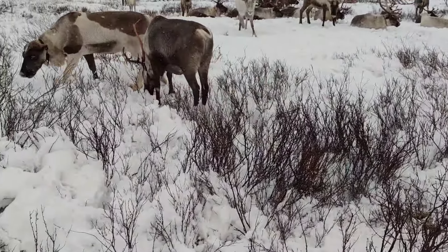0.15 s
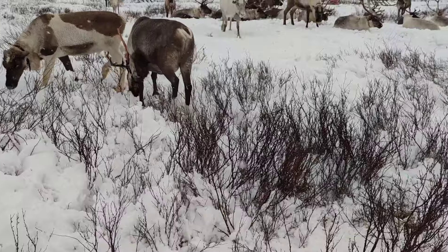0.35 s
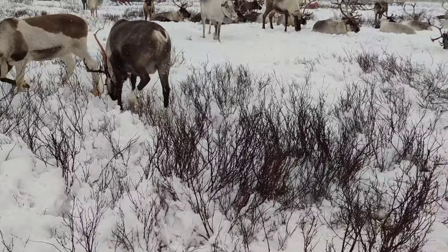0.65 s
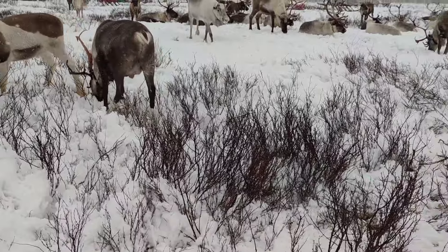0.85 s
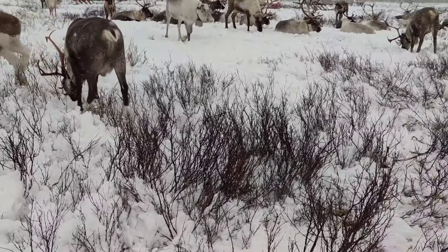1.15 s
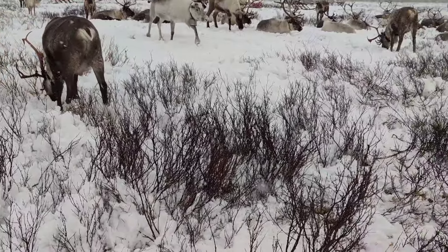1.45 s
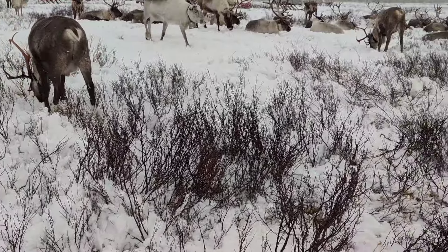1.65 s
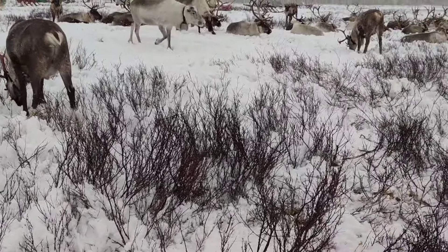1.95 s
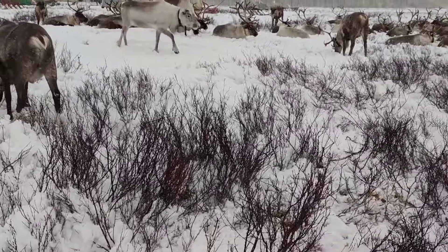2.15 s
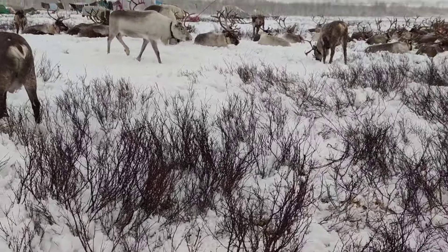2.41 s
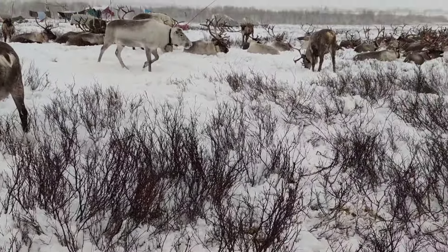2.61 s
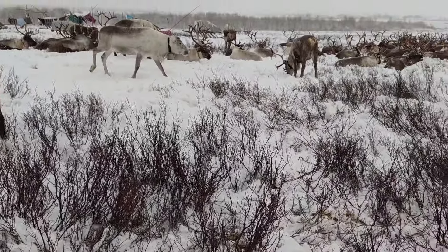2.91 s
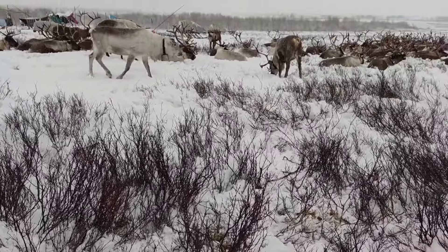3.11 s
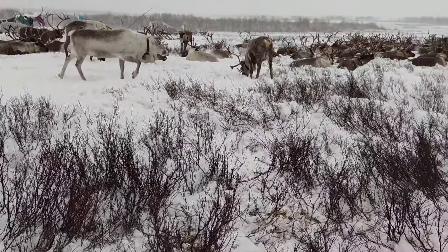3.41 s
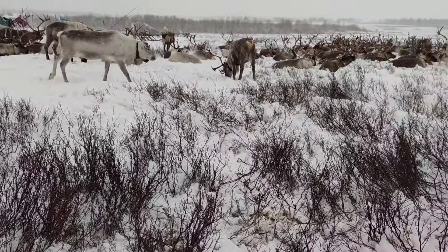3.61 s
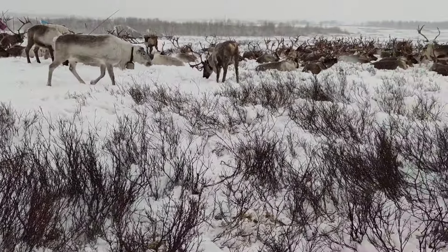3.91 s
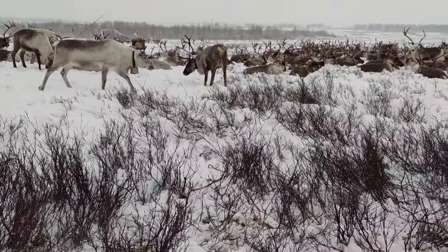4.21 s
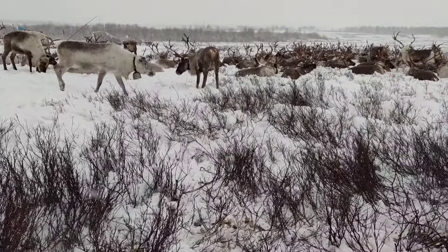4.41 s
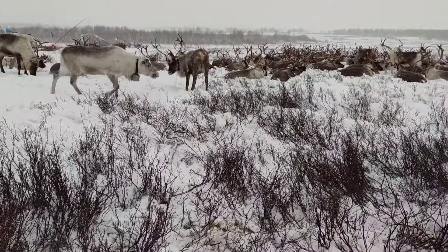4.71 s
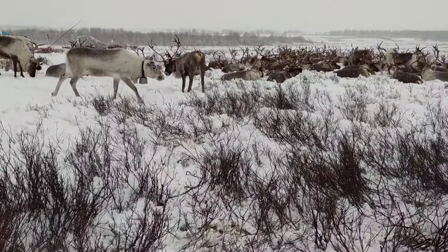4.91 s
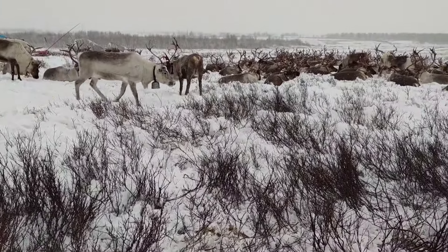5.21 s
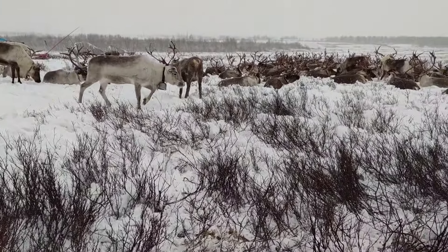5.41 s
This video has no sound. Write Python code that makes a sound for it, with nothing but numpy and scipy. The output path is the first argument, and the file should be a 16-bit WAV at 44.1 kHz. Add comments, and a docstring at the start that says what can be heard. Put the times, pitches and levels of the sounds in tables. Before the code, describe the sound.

Outdoors among reindeer on snow and low brush, close and dry, without echo. The first 0.35 seconds are dominated by rough wind flutter and thumps on the microphone, hardest on the right; beneath them a low bell hum already rings, a tiny bell tinkles and a faint far bell pings at about 0.2. From 0.6 a collar bell clanks roughly every 0.3 to 0.4 seconds, uneven in strength and tone: short, rattly, metallic strikes with bright overtones and a lingering hum. Pellet tinkles scatter around 0.5, 1.4 to 2.0 and 3.8 to 4.7. Crisp snow crunch and dry twig snaps run throughout, busy around 2.3 to 3.5, with a sharp snap near 4.2. Low wind rumble continues with smaller buffets, notably around 2.7 and 4.3. The clanks fade and end at 4.9; last tinkles come at 5.2 to 5.4 as the crunch swells, ending near 5.5.

```python
"""Reindeer graze and walk through snow and low brush.
At the start, gusts flutter hardest on the right, a low bell hum already rings and a far bell pings once.
Then a collar bell clanks as one animal steps: its clapper strikes wall modes that ring and fade.
All along, noise grains crunch as snow, short noise puffs snap as twigs, and a tiny pellet bell tinkles.
Near the end the clanks have stopped; the pellet bell tinkles a last few times and the crunch swells."""
import sys
import numpy as np
from scipy import signal
from scipy.fft import rfft, irfft, next_fast_len
from scipy.io import wavfile
from scipy.ndimage import uniform_filter1d, map_coordinates

SR = 44100
rng = np.random.default_rng(int(sys.argv[2]) if len(sys.argv) > 2 else 0)


def wav_record(signal):
    """Record a signal, one row per channel, as 16-bit PCM in the file named by sys.argv[1]."""
    frames = np.transpose(np.atleast_2d(signal))
    bounded = np.clip(frames, -1, 1)
    # unit amplitude maps onto the largest positive 16-bit level
    quanta = np.round(bounded * 32767).astype(np.int16)
    wavfile.write(sys.argv[1], SR, quanta)


N = 244755  # length in samples


def amp(db):
    """Turn decibels into a gain."""
    return np.exp(np.asarray(db) * np.log(10) / 20)


def unit(x):
    """Scale to rms 1."""
    return x / np.sqrt(np.mean(x ** 2) + 1e-20)


def pan(db):
    """Left and right gains, with mean 1, for a left-minus-right level in dB."""
    gains = amp(np.reshape(db, (1, -1)) * np.array([[.5], [-.5]]))
    return gains / gains.mean(0)


def curves(rows):
    """Join table points with straight lines: one curve for each column after the time."""
    times, *columns = np.transpose(rows)
    return [np.interp(np.arange(N) / SR, times, column) for column in columns]


def wobble(rate):
    """A smooth random curve through `rate` random points a second."""
    points = rng.standard_normal(int(N * rate / SR) + 4)
    return map_coordinates(points, [np.arange(N) * rate / SR])


def filtered(x, response):
    """Change the level of each frequency in x by response(Hz)."""
    size = next_fast_len(N + SR // 4)
    spectrum = rfft(x, size) * response(np.fft.rfftfreq(size, 1 / SR))
    return irfft(spectrum, size)[..., :N]


def coloured(x, spectrum):
    """Shape x by (f/Hz, level/dB) points, at rms 1."""
    f, db = np.transpose(spectrum)
    return unit(filtered(x, lambda hz: amp(np.interp(np.log(hz + 1), np.log(f), db))))


def even(x, seconds):
    """Hold noise near rms 1 over stretches of this length, leaving its faster lumps."""
    size = int(seconds * SR) + 1
    power = uniform_filter1d(uniform_filter1d(x ** 2, size), size)
    return x / np.sqrt(np.abs(power) + 1e-9)


def add(track, s, sound):
    """Mix a sound into the track at time s."""
    start = max(round(s * SR), 0)
    part = track[..., start:start + sound.shape[-1]]
    part += sound[..., :part.shape[-1]]


def burst(lo_hz, hi_hz, t60, order=2, rise=0):
    """A dying puff of noise in a band, with peak 1; rise is its build-up in seconds."""
    t = np.arange(SR // 10) / SR
    band = signal.butter(order, [lo_hz, min(hi_hz, SR / 2 - 1)], "band", fs=SR, output="sos")
    onset = np.minimum(t / rise, 1) if rise else 1
    puff = signal.sosfilt(band, rng.standard_normal(len(t)) * onset * amp(-60 * t / t60))
    return puff / np.abs(puff).max()


def ring(modes, attack, scatter_db):
    """One blow on a bell: each mode is a pure tone that fades, with its own level and delay on each side."""
    t = np.arange(SR // 2) / SR
    out = np.zeros((2, len(t)))
    for hz, db, t60, side_db, lead in modes:
        fade = amp(db + scatter_db * rng.standard_normal() - 60 * t / t60)
        phase = 2 * np.pi * hz * t + lead * np.array([[.5], [-.5]])
        out += pan(side_db) * fade * np.sin(phase)
    return out * (1 - np.exp(-t / attack))


# blows of the clapper: (t/s, level/dB, height on the wall about -1..1, angle round the rim/degrees,
# extra strike note level/dB, extra clang level/dB, clang shift f/Hz, low hum level/dB)
CLAPPER_BLOWS = [(0.64,-50,1.23,100,-1.5,-17,0,-58), (0.991,-43,-0.46,54,-7,-1.5,-8,-63.5),
                 (1.339,-48,0.53,97,6.5,-19,0,-64), (1.756,-44,-0.67,33,6.5,-4,21,-57.5),
                 (2.103,-40,-0.89,11.6,0.5,3.5,8,-63), (2.522,-44.5,0.25,54,-12.5,3.5,16,-62.5),
                 (2.801,-39,0.94,70.4,4,-0.5,1,-59), (3.211,-53,0.45,56,0,-6,0,-64),
                 (3.51,-40.5,0.9,15.8,-0.5,-5,5,-63.5), (3.887,-48,1.4,86,6.5,0.5,4,-65),
                 (4.167,-43.5,1.03,72,-0.5,-2.5,15,-52.5), (4.577,-59,1.4,56,-4.5,-5.5,0,-70),
                 (4.901,-55,0.77,96,-3,1.5,6,-55)]
# tones of the collar bell: (f/Hz, relative level/dB, 60 dB fade t/s, waves round the rim,
# antinode (strongest spot)/degrees, node depth 0-1, level per unit of height/dB, left minus right level/dB,
# left phase lead/radians)
COLLAR_MODES = [(2342.5, 0, .43, 2, 0, 0, 1.4, -7, .58), (4138, 0, .08, 4, 55, .8, 4.1, -3, .2),
                (4243, 12, .08, 4, 77.5, 1, 4.1, -3, .2), (4195, -3, .03, 4, 55, .3, 4.1, -3, .2),
                (4310, -9, .06, 4, 86, 1, 4.1, -3, .2), (6182, -1, .19, 5, 25, 1, 8.8, -10, 2.3),
                (6319, 2, .25, 5, 43, 1, 8.8, -10, 2.4), (6684, 4, .21, 2, 18, 1, -2.2, -9, 1.3),
                (6863, 5, .21, 2, 63, 1, -2.2, -9, 1.4), (8583, -4, .18, 6, 39, 1, 2, 4, 2.6),
                (8760, -6, .14, 6, 54, 1, 2, 3, 2.6), (10700, -11, .11, 7, 0, .4, 0, -13, 2.5),
                (11160, -11, .13, 3, 10, .4, 0, -14, 2.6), (11375, -9, .14, 3, 40, .4, 0, -14, 3.1),
                (12980, -14, .11, 8, 0, .4, 0, -13, -.3)]
NODE_FLOOR = 0.01  # added to the 0-1 energy of a struck mode, so a node is never silent
CLANG_ROUGH, CLANG_ROUGH_HZ = .22, 150  # depth of the clang's random roughness; its random points a second
SCUFF_DB, KNOCK_DB = -1.5, -1.5  # relative to the blow


def collar_bell():
    """The clapper knocks, scuffs and chatters; where it hits sets how strongly each wall mode rings."""
    out, clang = np.zeros((2, 2, N))
    hz, mode_db, t60, waves, antinode, depth, height_db, side_db, lead = np.transpose(COLLAR_MODES)
    is_note = hz < 3000
    is_clang = (hz > 3000) & (hz < 5000)
    for s, db, height, angle, note_db, clang_db, shift_hz, _ in CLAPPER_BLOWS:
        # a blow far from a mode's strongest spot excites it less
        closeness = np.cos(np.radians(waves * (angle - antinode))) ** 2
        node_db = 10 * np.log10(closeness + NODE_FLOOR)
        level_db = db + mode_db + height_db * height + depth * node_db
        level_db = level_db + note_db * is_note + clang_db * is_clang
        modes = np.transpose([hz + shift_hz * is_clang, level_db, t60, side_db, lead])
        add(out, s, ring(modes[~is_clang], attack=0.001, scatter_db=0.4))
        add(clang, s, ring(modes[is_clang], attack=0.0017, scatter_db=6.0))
        scuff = amp(db + SCUFF_DB) * burst(1200, 8600, t60=0.075, order=4)
        splash = amp(db - 6) * burst(10600, 13300, t60=0.15, order=4)
        knock = amp(db + KNOCK_DB) * burst(800, 7600, t60=0.011)
        add(out, s, pan(-3) * scuff)
        add(out, s, pan(-21) * splash)
        add(out, s - .001, pan(-22) * knock)
    return out + clang * (1 + CLANG_ROUGH * wobble(CLANG_ROUGH_HZ))


HUM_HZ, HUM_T60_S, HUM_START_DB = 865, 2.9, -57  # pitch, 60 dB fade time, level at the very start


def bell_hum():
    """The collar bell's lowest mode sings on from blow to blow; the strongest swell wins."""
    t = np.arange(N) / SR
    blows = [(0, HUM_START_DB)] + [(s, hum_db) for s, *_, hum_db in CLAPPER_BLOWS]
    swells = []
    for s, db in blows:
        onset = np.clip((t - s) / 0.0018, 0, 1)
        swells.append(amp(db - 60 * np.abs(t - s) / HUM_T60_S) * onset)
    return pan(-3.5) * np.max(swells, axis=0) * np.sin(2 * np.pi * HUM_HZ * t)


# blows of the pellet, before the gain below: (t/s, level/dB,
# lowest family relative level/dB, highest family relative level/dB)
PELLET_BLOWS = [(.029, -60, -28, -32), (0.098, -45.5, -19, -3.5), (0.432, -59, -17, -3),
                (.527, -53, -32, -9), (.593, -59.5, -19, -2), (1.377, -61.5, -16, -10),
                (1.471, -57.5, -13.5, -12), (1.549, -55, -24, -12), (1.642, -65.5, -11.5, -8),
                (1.927, -50, -20, -12), (1.981, -49, -28, -14), (3.782, -58.5, -29, -8),
                (3.899, -45, -29, -9), (4.088, -60, -24, -7), (4.271, -54, -31, -16), (4.485, -53, -27, -4),
                (4.648, -58, -25, -8), (5.162, -47.5, -42, -14), (5.323, -47, -36, -14.5),
                (5.411, -42, -34, -23)]
# tones of the pellet bell, one list for each of three families, low to high: (f/Hz, level in the family/dB,
# 60 dB fade t/s, left minus right level/dB, left phase lead/radians)
PELLET_MODES = [
    [(2940, -5.5, 0.21, 18, 0.35), (2986, 5.5, 0.46, -14, 0.34)],
    [(3810, -36, .5, -9, .2), (4888, -34, .5, -6, .6), (5636, -31, .6, -8, 1.2), (7654, -1, .38, 1, -.5),
     (7680, -12, .3, 1, -.5)],
    [(11480, -8, .16, -12, -2.5), (11782, -4, .17, -14, -1.5), (11915, -9, .16, -14, -1.6),
     (12085, -5, .17, -15, -1.7)],
]


def pellet_bell():
    """A loose pellet strikes a tiny shell; modes close in pitch beat against each other."""
    out = np.zeros((2, N))
    for s, db, low_db, high_db in PELLET_BLOWS:
        modes = []
        for family, family_db in zip(PELLET_MODES, [low_db, 0, high_db]):
            for hz, mode_db, *rest in family:
                modes.append((hz, db + family_db + mode_db, *rest))
        add(out, s, amp(4.0) * ring(modes, attack=0.00082, scatter_db=3.0))
    return out


# loudest snaps of twigs and snow crust: (t/s, click level/dB before a cut below, woody knock level/dB,
# bright edge level/dB, left minus right level/dB)
LOUD_SNAPS = [(.1245,-27.5,-43,-73,-17), (0.1403,-27,-34,-79,-15), (0.3604,-40,-46,-59,-9),
              (0.415,-40,-63,-65,-12), (.5607,-27.5,-55,-71,-12), (0.6996,-34.5,-55,-58,-10),
              (0.9524,-32,-40,-47,-13), (0.9862,-36,-54,-60,-7), (1.854,-41,-61,-58,-4),
              (2.191,-44,-49,-66,-15), (2.3016,-28.5,-47,-54,-10), (2.326,-37,-59,-64,-12),
              (2.356,-37,-43.5,-60,-12), (2.4086,-36,-35.5,-39,-12), (2.4722,-45,-34.5,-51,6),
              (2.484,-41,-46,-53,-12), (2.672,-39,-42.5,-61,-12), (2.9105,-33,-47,-42,-19),
              (2.927,-33,-53,-53,-16), (3.297,-37,-45,-59,-4), (3.344,-30,-50,-57,-8),
              (3.3675,-29.5,-35,-57,-20), (3.412,-33.5,-51,-68,-12), (3.442,-44,-38.5,-53,9),
              (3.483,-32.5,-47,-47,-11), (3.5746,-32,-43,-67,-14), (4.012,-38,-52,-66,-14),
              (4.1649,-23.5,-38,-55,-16), (4.242,-29.5,-42,-66,-16), (4.414,-45,-41.5,-55,-13),
              (4.426,-28.5,-35.5,-61,-28), (4.9014,-28,-43,-57,-15), (5.319,-27,-55,-63,-14)]
SMALL_SNAPS_PER_S, SMALL_SNAP_DB = 5.5, 16.5  # how often; starting level over the crunch curve


def snaps():
    """Breaking twigs and crust give a dry click, woody knock and bright edge; small ones follow the crunch."""
    out = np.zeros((2, N))
    crunch_db, = curves(HOOF_CRUNCH)
    small = []
    for when, size, woody, bright in rng.random((round(SMALL_SNAPS_PER_S * N / SR), 4)):
        db = crunch_db[int(when * N)] + SMALL_SNAP_DB - 6 * size
        small.append((when * N / SR, db, db - 14 * woody, db - 5 - 15 * bright, -10))
    for s, click_db, knock_db, edge_db, side_db in LOUD_SNAPS + small:
        click = amp(click_db - 7.5) * burst(4700, 7430, t60=0.0068, order=3)
        edge = amp(edge_db) * burst(9200, 15000, t60=0.0046)
        knock = amp(knock_db) * burst(1130, 3200, t60=0.0047)
        add(out, s, pan(side_db) * (click + edge + knock))
    return out


# hooves in snow, before the gain below: (t/s, level/dB)
HOOF_CRUNCH = [(0.0, -63.5), (0.23, -71), (0.57, -69.5), (0.93, -70.5), (1.14, -75.5), (1.36, -77),
               (1.84, -66.5), (2.1, -75.5), (2.44, -64.5), (2.75, -73.5), (2.95, -68), (3.41, -71),
               (3.54, -73), (3.82, -74), (4.4, -65), (4.64, -74), (5.02, -81), (5.55, -63.5)]
# tone colour of the packing snow: (f/Hz, relative level per Hz/dB)
SNOW_COLOUR = [(900, 1), (2000, -2), (3500, -1.5), (5200, -5.5), (6600, 4.5), (7600, -0.5), (9200, -28),
               (11000, -9.5), (14000, -8.5), (15000, -39)]
TREAD_S, TREAD_DB = 0.015, -40  # swell round a loud snap: half-width; level against its click, before the gain


def snow():
    """Packing snow gives dense tiny cracks, a few of them much larger; it swells round each loud snap."""
    t = np.arange(N) / SR
    treads = sum(amp(db + TREAD_DB) * np.exp(-((t - s) / TREAD_S) ** 2) for s, db, *_ in LOUD_SNAPS)
    level = np.hypot(amp(curves(HOOF_CRUNCH)[0]), treads)
    is_crack = rng.random(N) < 550 / SR  # about 550 a second
    sizes = is_crack * amp(3.96 * np.minimum(rng.exponential(size=N), 5))
    grains = signal.lfilter([1], [1, -np.exp(-1 / (0.0021 * SR))], sizes)  # each dies over some 2 ms
    shared, own = rng.standard_normal(N), rng.standard_normal((2, N))  # same on both sides; one per side
    cracks = coloured(grains * (shared + 7.1 * own), SNOW_COLOUR)
    return pan(-7.0) * amp(8.0) * level * cracks


# eddies on the right port: (t/s, puff level/dB, top of the puff f/Hz, pressure swing level/dB)
EDDY_SLAPS = [(.014,-19.5,1140,-6.5), (0.057,-28.5,940,-18), (0.099,-15.5,1034,-6.5), (0.15,-26,1440,-3),
              (.197,-19.5,1590,-11), (.231,-17.5,1750,-10.5), (0.24,-21,1110,-22), (.261,-35,1230,-22),
              (0.285,-25,1140,-12.5), (.299,-24.5,1270,-3), (0.316,-30.5,1250,-8), (.340,-36,1140,-20),
              (0.59,-28.5,575,-16.5), (0.882,-32.5,830,-24), (1.212,-36,570,-27), (1.603,-34.5,850,-26),
              (1.672,-32.5,603,-24), (1.799,-42,490,-23), (2.320,-38,750,-35), (2.512,-31,580,-27),
              (2.537,-38.5,660,-33), (2.725,-23,690,-9.5), (2.747,-31,534,-21), (2.917,-37,750,-14.5),
              (3.164,-41,1270,-13.5), (3.277,-32,785,-20), (3.365,-37,574,-21), (3.477,-32.5,860,-33),
              (3.597,-39,493,-22), (3.933,-36.5,605,-28), (4.213,-38,1030,-11.5), (4.289,-35,1200,-28),
              (4.348,-28.5,694,-16.5), (5.423,-27.5,660,-21), (5.501,-33,816,-25)]
EDDY_RISE_S, EDDY_T60_S, SWING_S = 0.00073, 0.039, 0.0017  # puff build-up, puff fade, swing half-width


def eddies():
    """An eddy slaps the right port: a peaked swing of pressure, up or down, with a short ragged puff."""
    out = np.zeros(N)
    lead = .012  # seconds from the start of the swing to its crest
    t = np.arange(-lead, lead, 1 / SR)
    crest = np.hanning(len(t)) / (1 + (t / SWING_S) ** 2)
    for s, puff_db, top_hz, swing_db in EDDY_SLAPS:
        puff = burst(268, top_hz, t60=EDDY_T60_S, order=5, rise=EDDY_RISE_S)
        add(out, s - lead, amp(swing_db) * rng.choice([-1, 1]) * crest)
        add(out, s - .001, amp(puff_db) * puff)
    return pan(-23.5) * out


# gusts that hit the microphone: (crest t/s, length t/s, flutter level/dB, left minus right level/dB,
# rumble over flutter level/dB)
GUST_HITS = [(0.008, 0.039, -17, -27, 6), (0.05, 0.023, -27, -24, 9.5), (0.1, 0.039, -23, -26, 1.5),
             (0.151, 0.013, -22.5, -23, 15.5), (0.201, 0.029, -21.5, -18, 2), (0.233, 0.037, -22, -11, 0),
             (0.303, 0.033, -21, -28, -0.5), (0.331, 0.03, -22.5, -13, 5.5),
             (0.508, 0.25, -37.5, -2.5, 13.5), (0.586, 0.013, -30, -33, 14.5), (0.659, 0.066, -30, -2, 7.5),
             (0.743, 0.029, -33.5, -20, 14), (0.869, 0.071, -31.5, -7.5, 11.5), (1.025, 0.027, -37, -6, 18),
             (1.225, 0.043, -35, -11, 13.5), (1.421, 0.027, -38, -30, 14.5), (1.604, 0.041, -37.5, -16, 10),
             (1.662, 0.029, -35.5, -3, 16.5), (1.807, 0.034, -43, -15.5, 18.5),
             (2.324, 0.022, -40.5, -25, 10.5), (2.524, 0.035, -31.5, -29, 7.5),
             (2.565, 0.011, -30.5, -27, 4.5), (2.73, 0.012, -27.5, -13, 6), (2.852, 0.062, -34, -4.5, 14.5),
             (2.906, 0.048, -31, -7, 12.5), (3.177, 0.029, -35, 2.5, 19.5), (3.234, 0.047, -30, -4.5, 10),
             (3.278, 0.04, -27.5, -6, 10), (3.37, 0.024, -38.5, 2, 11), (3.498, 0.041, -30.5, -17, 8),
             (3.584, 0.06, -36.5, -1, 14), (3.639, 0.043, -35.5, -26, 12.5), (3.809, 0.1, -44, -16.5, 20.5),
             (3.923, 0.021, -32.5, -36, 10.5), (4.039, 0.0062, -35, -20, 10), (4.207, 0.021, -29, -20, 11),
             (4.297, 0.024, -27, -9, 5.5), (4.346, 0.014, -31, -9, 5), (4.546, 0.22, -39, -24, 12.5),
             (4.767, 0.053, -35, -15.5, 11.5), (4.893, 0.069, -37, -10.5, 14.5),
             (4.978, 0.054, -33.5, -11, 12.5), (5.116, 0.071, -40.5, -37, 15.0),
             (5.234, 0.049, -42.5, -22, 19.5), (5.41, 0.052, -34, -25, 15.5), (5.492, 0.015, -28, -20, 6.5)]
GUST_RISE, GUST_TAIL = 0.75, 1.9  # rise time as a share of the length; how steeply the skirts fall


def gusts():
    """Strength of the gusts' rumble and flutter at each port: each swells quickly and dies more slowly."""
    t = np.arange(N) / SR
    rumble, flutter = np.zeros((2, 2, N))
    for s, length, db, side_db, rumble_db in GUST_HITS:
        width = np.where(t < s, GUST_RISE * length, length)
        shape = 1 / (1 + ((t - s) / width) ** 2) ** GUST_TAIL
        power = (pan(side_db) * amp(db) * shape) ** 2
        flutter += power
        rumble += power * amp(rumble_db) ** 2
    return np.sqrt(rumble), np.sqrt(flutter)


# wind between the gusts, before the gains below: (t/s, level/dB)
STEADY_WIND = [(0.0, -28), (0.3, -24.5), (0.42, -30.5), (0.9, -38), (1.1, -34.5), (1.36, -38), (1.55, -33),
               (1.95, -40), (2.25, -37), (2.5, -32), (3.05, -33), (3.45, -33.5), (3.73, -43), (4.1, -33.5),
               (4.25, -28), (4.45, -41.5), (5.3, -40), (5.55, -37.5)]
# tone colour of the low rumble: (f/Hz, relative level per Hz/dB)
RUMBLE_COLOUR = [(10, 0.5), (25, 1), (43, 0.5), (65, -3.5), (110, -6.5), (180, -13.5), (300, -29.5),
                 (600, -57.5), (1200, -78)]
# tone colour of the brighter flutter: (f/Hz, relative level per Hz/dB)
FLUTTER_COLOUR = [(60, -34), (140, 1), (250, -1), (400, -7.5), (650, -18), (1000, -31), (1600, -40.5),
                  (3000, -47), (8000, -86)]
CALM_DB, FLUTTER_GROWS = -33.5, 2.3  # usual level in the wind table; dB of flutter per dB of wind about it


def wind():
    """Turbulence presses on each port separately; strong wind and gusts tear into a brighter flutter."""
    wind_db, = curves(STEADY_WIND)
    swell_db = 3.2 * np.array([wobble(22.67), wobble(12)])
    flutter_db = CALM_DB + FLUTTER_GROWS * (wind_db - CALM_DB) + .5 * swell_db
    gust_rumble, gust_flutter = gusts()
    rumble = even(coloured(rng.standard_normal((2, N)), RUMBLE_COLOUR), seconds=0.047)
    lumps = amp(5.1 * np.array([wobble(110), wobble(110)]))
    flutter = even(coloured(lumps * rng.standard_normal((2, N)), FLUTTER_COLOUR), seconds=0.032)
    # steady wind and gusts add as powers
    rumble_level = np.hypot(pan(-5.5) * amp(wind_db + swell_db + 6.0), gust_rumble)
    flutter_level = np.hypot(pan(-9.5) * amp(flutter_db - 15.5), gust_flutter)
    return rumble_level * rumble + flutter_level * flutter


# another small bell further off, a single row: (t/s, f/Hz, level/dB, 60 dB fade t/s)
FAR_BELL_PING = (.185, 4330, -59, .45)


def far_bell():
    """One faint, pure ping from the herd: a single fading tone."""
    out = np.zeros((2, N))
    s, hz, db, t60 = FAR_BELL_PING
    add(out, s, ring([(hz, db, t60, -4, 0)], attack=.002, scatter_db=3))
    return out


# tone colour of the open air: (f/Hz, relative level per Hz/dB)
AIR_COLOUR = [(50, -0.5), (300, -2), (800, -11.5), (1500, -18), (3000, -22.5), (7000, -27), (9500, -27),
              (14000, -32)]


def air():
    """The faint rush of open country: steady shaped noise."""
    return pan(7.2) * amp(-62.0) * coloured(rng.standard_normal((2, N)), AIR_COLOUR)


def scene():
    """Soft snow returns no echo, so everything arrives dry."""
    bells = collar_bell() + bell_hum() + pellet_bell() + far_bell()
    trampling = snaps() + snow()
    return bells + trampling + wind() + eddies() + air()


TOP_HZ = 14900  # nothing is kept from here up


def record(dry):
    """Round off the largest peaks, fade in over 4 ms and cut everything above the band limit."""
    held = dry / (1 + np.abs(dry) ** 6) ** (1 / 6)
    fade_in = np.minimum(np.arange(N) / (.004 * SR), 1)
    return filtered(held * fade_in, lambda hz: hz < TOP_HZ)


dry = scene()
out = record(dry)
wav_record(out)
```